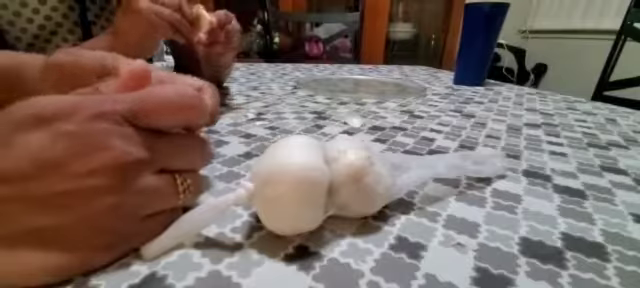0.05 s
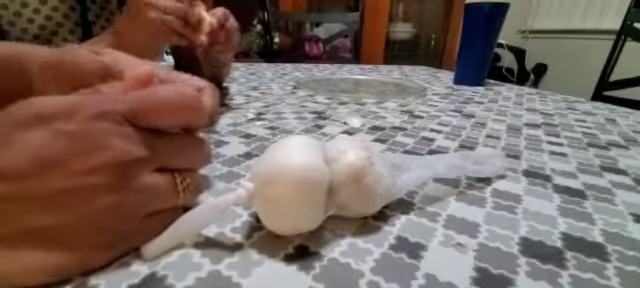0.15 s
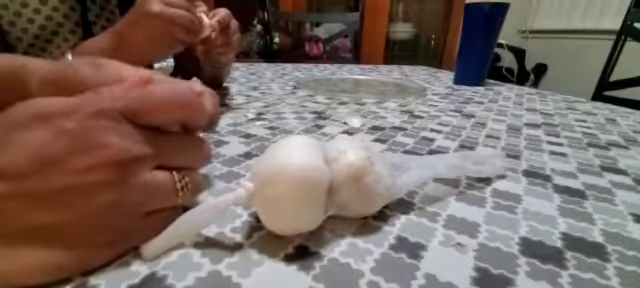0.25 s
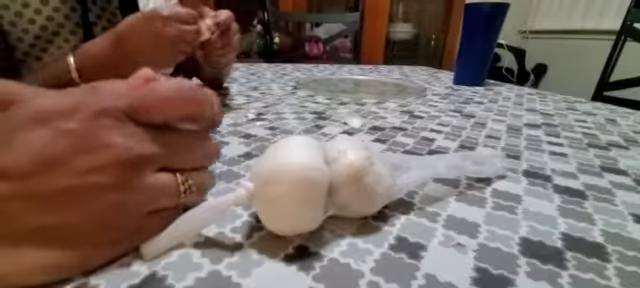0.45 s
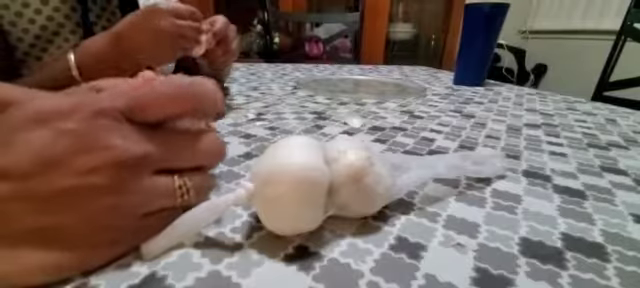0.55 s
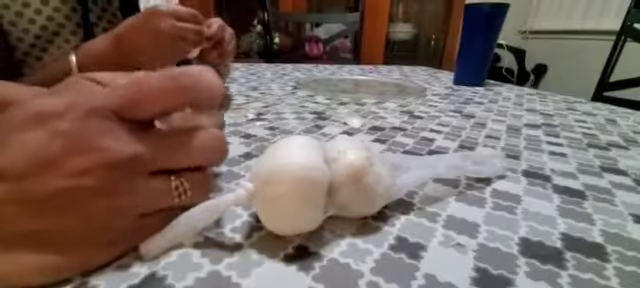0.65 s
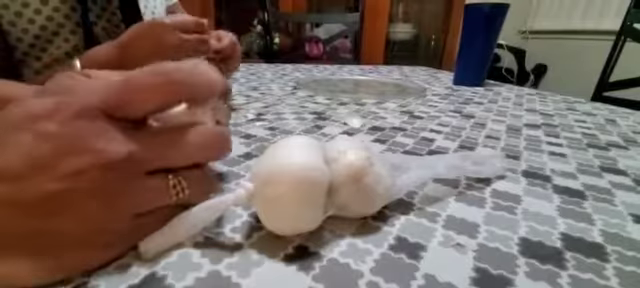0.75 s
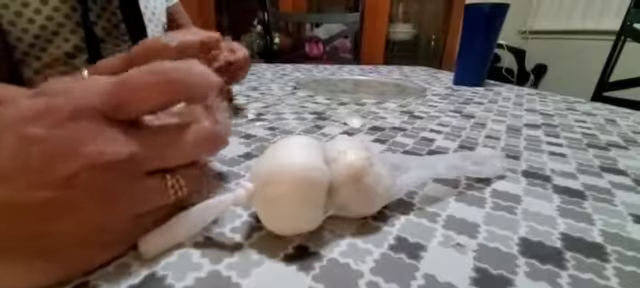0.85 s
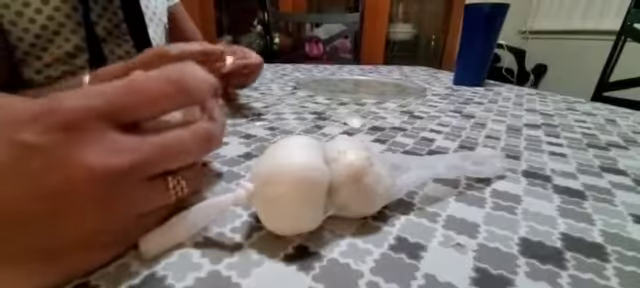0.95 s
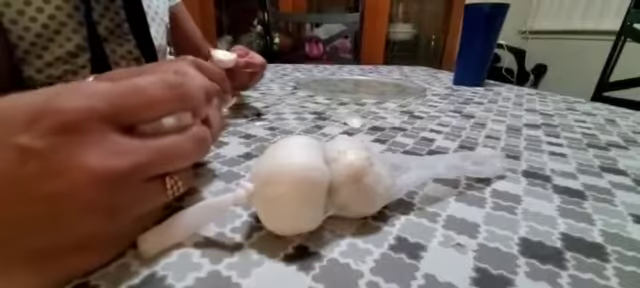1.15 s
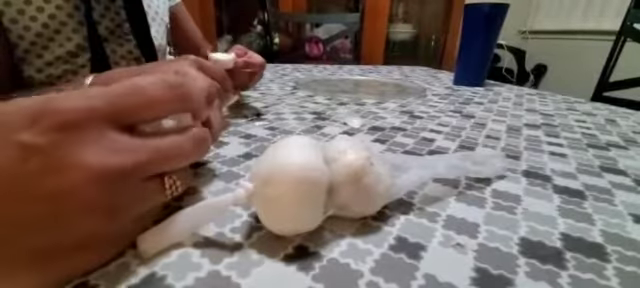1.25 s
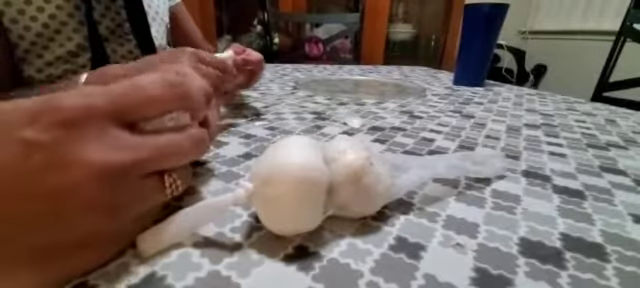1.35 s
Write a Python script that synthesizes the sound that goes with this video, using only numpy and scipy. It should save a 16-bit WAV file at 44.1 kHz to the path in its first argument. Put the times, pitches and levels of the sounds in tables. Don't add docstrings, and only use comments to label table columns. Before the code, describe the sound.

Dry garlic skin being peeled by fingers, crackling, ticking and tearing crisply close to the microphone

```python
import sys
import numpy as np
from scipy import signal
from scipy.fft import rfft, irfft, next_fast_len
from scipy.io import wavfile
from scipy.ndimage import uniform_filter1d

SR = 44100
rng = np.random.default_rng(int(sys.argv[2]) if len(sys.argv) > 2 else 0)


def dump_mix(stems):
    frames = np.atleast_2d(stems).T
    limited = np.clip(frames, -1, 1)
    pcm = np.round(limited * 32767).astype(np.int16)
    wavfile.write(sys.argv[1], SR, pcm)


def magnitude_from_level(level_db):
    exponent = np.asarray(level_db, float) / 20
    return 10 ** exponent


N = 61739


def cut(x, hz, kind, order=2):
    return signal.sosfilt(signal.butter(order, hz, kind, fs=SR, output="sos"), x + 1e-18)


def resonance(x, hz, width_hz):
    r = np.exp(-np.pi * width_hz / SR)
    feedback = [1, -2 * r * np.cos(2 * np.pi * hz / SR), r * r]
    return signal.lfilter([(1 - r * r) / 2, 0, (r * r - 1) / 2], feedback, x)


def drift(rate_hz):
    r = np.exp(-2 * np.pi * rate_hz / SR)
    slow = signal.lfilter([1], [1, -2 * r, r * r], rng.standard_normal(N + SR))[SR:]
    return slow / slow.std()


def grains(per_s, spread_db):
    sizes = magnitude_from_level(spread_db * np.minimum(rng.exponential(1, (2, N)), 4.0))
    sizes = sizes * rng.standard_normal((2, N))
    clicks = sizes * (rng.random((2, N)) < per_s / SR)
    return clicks / clicks.std()


def skin(clicks, mid, bright, low):
    low_hz, split_hz = 4190, 6710
    middle = cut(clicks * mid, [low_hz, split_hz], "band", order=3)
    middle = middle + magnitude_from_level(1) * resonance(middle, 6300, 300)
    shoulder = cut(clicks * mid, [2440, low_hz - 500], "band") * magnitude_from_level(-11.5 + 1.6 * drift(4.7))
    dullness = np.clip((mid + 1e-9) / (bright + 1e-9), .1, 10)
    shoulder = shoulder * dullness ** 0.1
    top = cut(clicks * bright, split_hz, "high", order=3) * magnitude_from_level(3.5)
    both = middle - shoulder + top
    return both - .5 * resonance(both, 9400, 1500) + low


def hum():
    # pitch_hz, level_db (per Hz)
    room_tone = np.array([(15, -55), (25, 8), (140, 11.5), (366, 0), (1080, -1), (1370, 8), (2130, 1),
                          (3000, -17), (3900, -29), (6600, -120)])
    alike = 0.54
    hz = np.fft.rfftfreq(N, 1 / SR) + 1
    level_db = np.interp(np.log(hz), np.log(room_tone[:, 0]), room_tone[:, 1])
    gain = magnitude_from_level(level_db) * (hz > 20) * (hz < 3000)
    mid, side = irfft(rfft(rng.standard_normal((2, N))) * gain, N)
    both = np.sqrt(1 + alike) * mid + np.sqrt(1 - alike) * side * [[1], [-1]]
    return magnitude_from_level(-73.5) * both / both.std()


def rustle():
    # start_s, level_db, brightness_db, hand_hollow_db
    strokes = [(0, -37, -3, -22), (0.052, -56.5, 0, -30), (0.106, -46.5, -9, -33), (0.183, -54.5, -4, -17),
               (0.258, -38, -9.5, -21), (.3, -46, -9, -15), (.44, -41, -8.5, -21), (0.501, -48, 14, -15.5),
               (.53, -58.5, 9, -2.5), (0.596, -42, -1, -7.5), (0.712, -40.5, -4.5, -16),
               (0.779, -53.5, -4, -11), (0.834, -43.5, -5.5, -23), (1.0, -41.5, -1, -25),
               (1.082, -34.5, -8, -28), (1.162, -63.5, 9, -23), (1.32, -44, -9.5, -23.5),
               (1.4, -56, -3.5, -44)]
    # pitch_hz, width_hz, level_db, start_s,
    # end_s
    hand_hollows = [
        (350, 8.2, -11.5, 0.47, 0.97),
        (363.6, 22, 5.5, .77, .87),
        (800, 40, -6, 0.47, 0.89),
        (1368, 95, 9.5, 0.022, 1.6),
        (1640, 180, -1.5, 0, 1.2),
        (1206, 27, 9.5, 0.99, 1.1),
        (3390, 190, 9, .84, .875),
    ]
    t = np.arange(N) / SR
    s, *columns = np.transpose(strokes)
    db, bright_db, hollow_db = [np.interp(t, s, column) for column in columns]
    clump_db = drift(47)
    clicks = grains(11000, 3.3)

    hollow = np.zeros(N)
    for hz, width_hz, level_db, start, end in hand_hollows:
        flicker_db = 2.5 * drift(20.6)
        push = clicks[0] * magnitude_from_level(db + hollow_db + 14 + level_db + flicker_db)
        hollow += resonance(push * (t > start) * (t < end), hz, width_hz)

    rub = cut(rng.standard_normal(N), [100, 430], "band") * magnitude_from_level(db + hollow_db + 1)
    mid = magnitude_from_level(db + clump_db + 0.51 * drift(32))
    bright = magnitude_from_level(db + bright_db + clump_db + 2.9 * drift(24.4))
    return skin(clicks, mid, bright, hollow), rub


def ticks_and_tears():
    # start_s, peak_db, brightness_db
    ticks = [(0.0122, -35.9, 1.4), (0.0288, -39.4, 4.5), (0.1483, -38.3, 1.2), (0.1588, -36.5, -15.7),
             (0.189, -36.7, -10.9), (0.2678, -29.8, -9.8), (0.3522, -18.4, -8.1), (0.4124, -27.7, -15.1),
             (0.4329, -33.2, -8.6), (0.449, -37.2, 2.2), (0.4649, -38.6, 3.6), (0.5744, -43.9, 3.8),
             (0.5888, -32.1, -6.8), (0.6593, -38.9, 6.2), (0.6703, -36.5, -0.3), (0.8754, -33.4, -14.1),
             (0.9318, -42.3, 9.9), (0.9362, -38.3, 6.8), (1.105, -23.0, -2.5), (1.1257, -31.2, -1.6),
             (1.1827, -42.4, -1.3), (1.1858, -46.2, 5.5), (1.1977, -51.1, 4.5), (1.2191, -54.5, 10.9),
             (1.279, -33.7, -13.7), (1.2887, -42.7, -7.9), (1.2939, -34.0, -11.6), (1.3002, -31.2, -16.7),
             (1.311, -34.8, -13.1), (1.397, -44.3, -1.7)]
    # start_s, peak_db, brightness_db, body_db, length_s
    tears = [(0.2292, -19, -1.0, -14, 0.005), (0.2306, -11.2, -10.6, -18.3, 0.0012),
             (0.238, -25.5, -10.0, -22.0, 0.003), (0.3073, -23.4, 4.2, -16, 0.005),
             (0.3178, -24.7, 3.7, -23.4, 0.0015), (0.321, -13.5, -2.4, -10, 0.007),
             (0.3296, -9.0, -12.2, -23.9, 0.0015), (0.34, -13.1, -6.1, -27.3, 0.002),
             (0.468, -34.5, 2.2, -32.0, 0.004), (0.4779, -32.2, 4.5, -41.4, 0.0015),
             (0.48, -26.7, 6.5, -46.2, 0.0025), (0.4858, -25.4, 6.0, -35.2, 0.003),
             (0.539, -17.9, -10, -40, 0.002), (0.5459, -13.8, -16.2, -46.0, 0.0012),
             (0.554, -31, -12, -34.2, 0.006), (0.5955, -21.5, -17.1, -13, 0.001),
             (0.597, -32.0, 1.9, -9.4, 0.002), (0.809, -38.3, -6.3, -22.7, 0.005),
             (0.912, -35.1, -0.9, -24.8, 0.005), (1.1, -28, -6, -30, 0.0035),
             (1.1165, -28.8, 2.1, -31.3, 0.003), (1.2362, -20.9, -6, -21, 0.002),
             (1.244, -37.0, -6.2, -25.1, 0.006), (1.3305, -31.0, -11.9, -37.9, 0.003)]
    rip_starts = [
        .24,
        .32,
        .486,
        .546,
        1.1,
    ]
    # level_db, brightness_db, body_db, t60_s (time to fall 60 dB)
    rips = [
        (-35, 0.5, -1.5, 0.17),
        (-11, -3, -11, 0.19),
        (-41, 12, -48, 0.11),
        (-28, -11, -17, .1),
        (-26.5, -2, -15.5, 0.15),
    ]
    lead_s, settle_t60_s, even_s = .0004, .03, .0015
    t = np.arange(N) / SR
    env = np.zeros((3, N))

    events = [(s, db + 1.5, bright_db, body_db, length) for s, db, bright_db, body_db, length in tears]
    events += [(s, db + 1, bright_db, -30, .0013) for s, db, bright_db in ticks]
    for s, db, bright_db, body_db, length in events:
        age = np.maximum(t - s + lead_s, 0)
        attack = np.minimum(age / (.2 * length), 1)
        hold = 1 / (1 + (age / length) ** 6)
        settle = magnitude_from_level(-16 - 60 * age / settle_t60_s)
        middle_db = -9 if length < .0026 else 0
        level = magnitude_from_level(db + np.array([[middle_db], [bright_db], [body_db]]))
        env = np.maximum(env, attack * (hold + settle) * level)

    for s, (db, bright_db, body_db, t60) in zip(rip_starts, rips):
        age = np.maximum(t - s, 0)
        level = magnitude_from_level(db - 60 * age / t60 + np.array([[0], [bright_db], [body_db]]))
        env = np.maximum(env, (age > 0) * level)

    clicks = grains(29000, 0.5)
    clicks = clicks / np.sqrt(uniform_filter1d(clicks ** 2, int(even_s * SR)) + .1)
    body = cut(clicks * env[2], [497, 2010], "band")
    body = resonance(body, 1530, 440) + magnitude_from_level(-21.5) * body
    return skin(clicks, env[0], env[1], body * magnitude_from_level(8.5))


def snaps():
    # time_s (each snap starts 0.8 ms before it), level_db, pitch_hz
    fibre_snaps = [(.149, -41, 4970), (0.1599, -37, 4900), (.1898, -37.5, 5400), (.2306, -25, 2590),
                   (.2313, -14.5, 4900), (0.2346, -23, 5940), (0.2375, -34, 5300), (.2394, -37, 5530),
                   (0.2441, -28, 5250), (.2687, -32, 5600), (0.3105, -20, 5940), (.3112, -25, 6000),
                   (.3233, -19, 5600), (0.3252, -9.5, 5420), (0.3256, -13.5, 6040), (0.33, -6, 5900),
                   (0.342, -13.5, 6350), (0.3548, -35, 5400), (0.3717, -44, 5500), (0.3932, -30, 4100),
                   (0.413, -26.5, 4000), (0.4334, -31, 4100), (0.4702, -44, 4070), (.4807, -43, 6670),
                   (0.4864, -27, 6150), (0.508, -36, 6300), (0.5408, -16, 4600), (0.5434, -25.5, 6300),
                   (.5467, -14.5, 4250), (.5551, -26.5, 4630), (0.556, -24.5, 4430), (0.5892, -21, 6650),
                   (.5963, -22, 4540), (0.6726, -41, 6000), (0.684, -33.5, 5400), (0.7132, -34, 5700),
                   (.8099, -46, 5900), (0.815, -42.5, 5470), (0.8769, -34.5, 4340), (.8903, -36.5, 5600),
                   (0.9137, -38, 5900), (0.939, -31.5, 6100), (1.0452, -51, 5060), (1.0988, -33, 5040),
                   (1.1014, -27.5, 5200), (1.1019, -22.5, 5900), (1.106, -28.5, 5260), (1.117, -27, 6060),
                   (1.126, -27.5, 6300), (1.1833, -36.5, 6560), (1.2355, -33.5, 3000),
                   (1.2371, -23.5, 5370), (1.2447, -38, 5400), (1.2799, -34.5, 5540), (1.2957, -29, 6800),
                   (1.3007, -29, 5760), (1.3119, -38, 5070), (1.3216, -43, 5250), (1.334, -33.5, 5040),
                   (1.3001, -37, 5460)]
    rise_cycles, lead_s = 1.25, .0008
    out = np.zeros(N + SR)
    for s, db, hz in fibre_snaps:
        turns = np.arange(200) / SR * hz
        x = turns / rise_cycles
        swell = x ** 2 * np.exp(2 - 2 * x)
        i = int((s - lead_s) * SR)
        out[i:i + 200] += magnitude_from_level(db + 0.5) * rng.choice([-1, 1]) * swell * np.sin(2 * np.pi * turns)
    return cut(out[:N], 2250, "high")


def bumps():
    # start_s, level_db, pitch_hz, t60_s
    table_bumps = [
        (0.227, -71, 60.9, 0.093),
        (.322, -48, 77.8, .3),
        (0.344, -55, 139, 0.18),
        (0.374, -50.5, 34.8, 0.29),
        (0.422, -68, 65.6, 0.25),
        (.595, -56, 88, 0.054),
    ]
    # start_s, level_db, pitch_hz, t60_s
    fingertip_knocks = [
        (.229, -53, 460, 0.026),
        (.230, -41.5, 915, 0.014),
        (.33, -50.5, 244, 0.039),
        (.598, -74, 96, 0.031),
        (1.123, -56, 840, 0.024),
        (1.125, -65, 553, 0.035),
        (1.2355, -62, 350, 0.015),
        (1.236, -60.5, 800, 0.021),
    ]
    push_cycles = 0.23
    out = np.zeros((2, N))
    for s, db, hz, t60 in [*table_bumps, *fingertip_knocks]:
        i = int(s * SR)
        t = np.arange(N - i) / SR
        turn = 2 * np.pi * hz * t
        swing = np.sin(turn) + magnitude_from_level(-8.5) * np.cos(turn) * [[1], [-1]]
        build = (1 - np.exp(-t * hz / push_cycles)) ** 2
        out[:, i:] += magnitude_from_level(db + 7.0 - 60 * t / t60) * build * swing
    return out


def room(x):
    t60_s, wall_cut_hz = .2, 7000
    size = next_fast_len(N + SR)
    hz = np.fft.rfftfreq(size, 1 / SR)
    echoes = []
    for lag in rng.uniform(0.0065, .03, 12):
        wall = magnitude_from_level(-60 * lag / t60_s) / (1 + 1j * hz / wall_cut_hz)
        loop = wall * np.exp(-2j * np.pi * hz * lag)
        echoes.append(loop / (1 - loop))
    sides = [sum(echoes[:6]), sum(echoes[6:])]
    return irfft(rfft(x, size) * sides, size)[:, :N]


def scene():
    far_lag_s, alike = .0003, .65
    soft, rub = rustle()
    near, other = ticks_and_tears() + soft
    crisp = snaps()
    far = alike * near + np.sqrt(1 - alike ** 2) * other + crisp
    far = np.interp(np.arange(N) - round(far_lag_s * SR), np.arange(N), far, left=0)
    near = near + crisp
    near, far = [v - .3 * resonance(v, 1900, 250) for v in (near, far)]
    return np.array([near, far]) + magnitude_from_level(-27) * room(near) + rub + bumps() + hum()


def roll_off(x):
    return signal.sosfilt(signal.butter(12, 16960, fs=SR, output="sos"), x)


def record(dry):
    port_hz, port_q = 5350, 4.8
    ceiling = 2.2
    w = 2 * SR * np.tan(np.pi * port_hz / SR)
    b, a = signal.bilinear([w * w], [1, w / port_q, w * w], SR)
    port = cut(signal.lfilter(b, a, dry[1]), 8350, "low", order=1)
    right = magnitude_from_level(1.5) * port + magnitude_from_level(-6.5) * resonance(dry[1], 9950, 2100)
    left = dry[0] + magnitude_from_level(-8.5) * resonance(dry[0], 14800, 1100)
    both = ceiling * np.tanh(np.array([left, right]) / ceiling)
    top_limit = signal.ellip(8, .2, 25, 16000, fs=SR, output="sos")
    return roll_off(signal.sosfilt(top_limit, both))


dry = scene()
out = record(dry)
dump_mix(out)
```